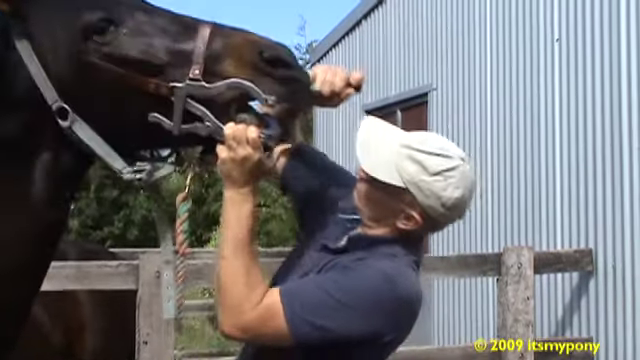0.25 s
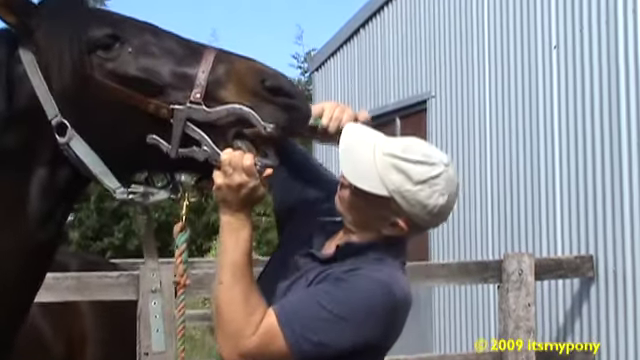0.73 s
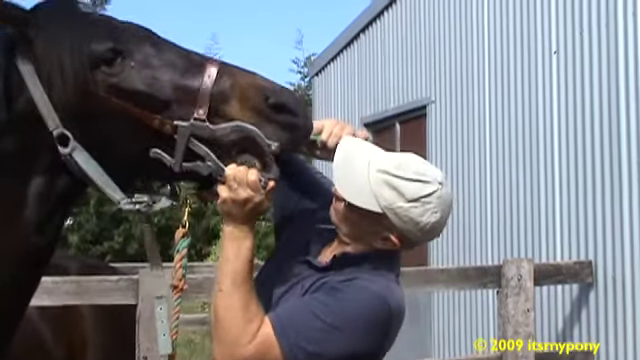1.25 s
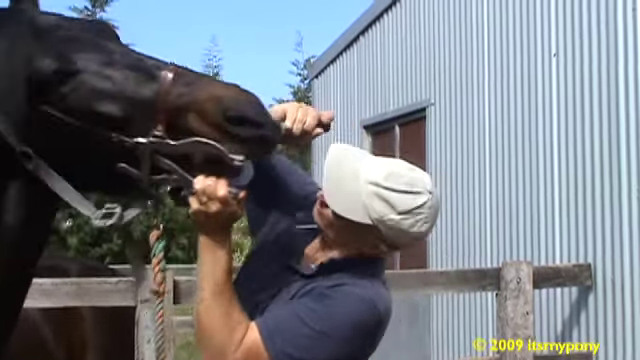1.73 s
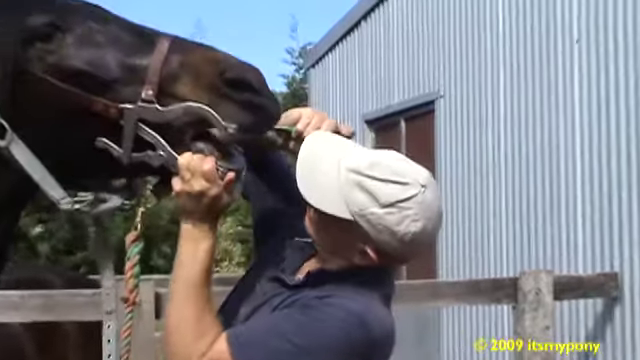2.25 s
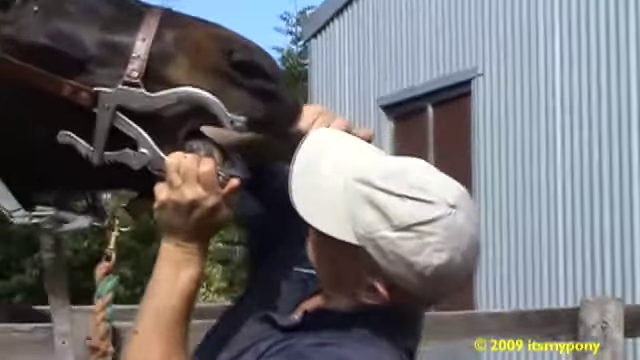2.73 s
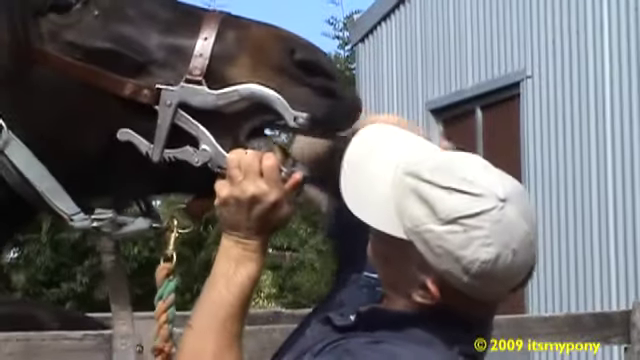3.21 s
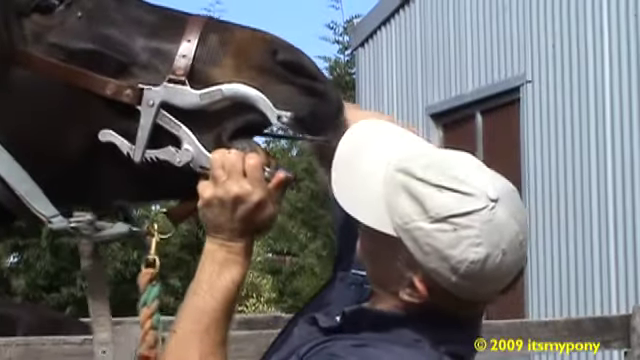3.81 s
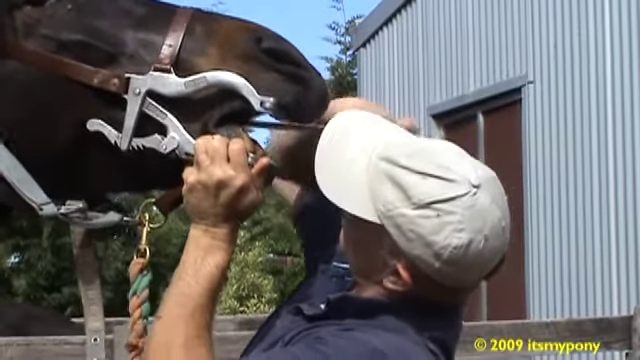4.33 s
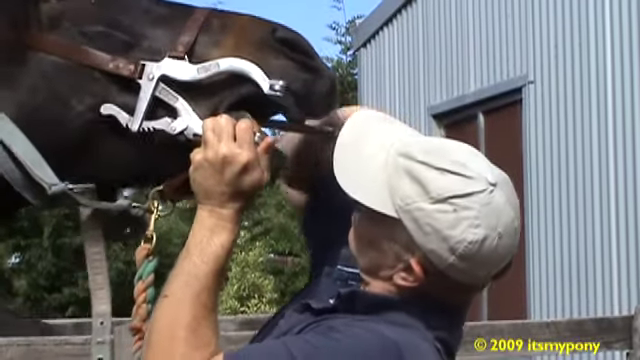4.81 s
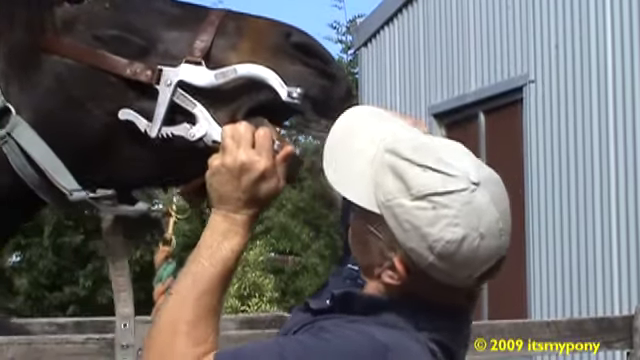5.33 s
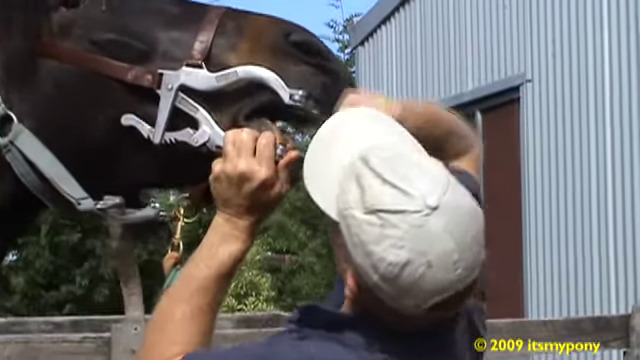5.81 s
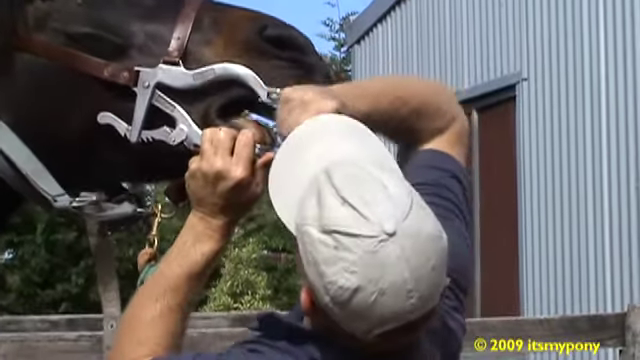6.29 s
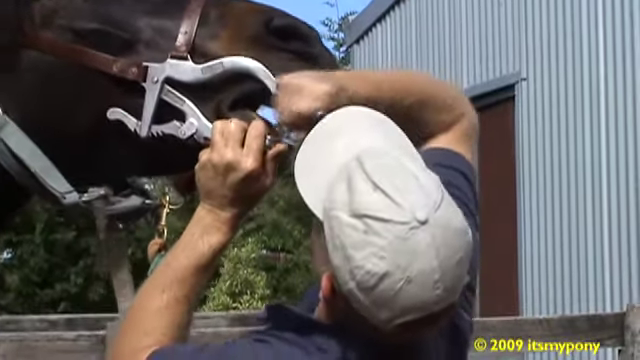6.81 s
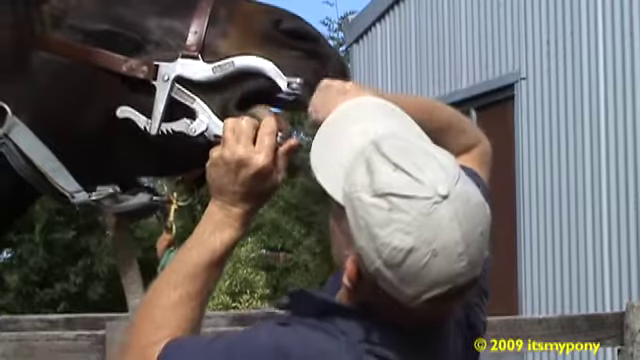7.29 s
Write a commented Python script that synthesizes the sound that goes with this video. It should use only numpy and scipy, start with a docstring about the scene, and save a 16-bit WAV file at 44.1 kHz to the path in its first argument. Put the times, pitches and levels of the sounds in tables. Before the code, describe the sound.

Hesitant short rubs and light tooth taps give way to steady, vigorous rasping, around ten strokes a second, rough and metallic with a bony resonance. Steel knocks grow frequent and hard, loudest in the second half, with dull thuds of arm and head near the end. The microphone is near, in open air beside a metal shed; soft traffic rumble and brief bird whistles remain in the background.

```python
"""A yard: a long steel rasp is worked in quick strokes over a horse's molars.
Random slips of the cut excite resonances of jaw and blade, and the shaft hums, partly locked to its own tone.
Steel knocks on tooth and mouth gag are decaying noise through resonances, with a sine for the gag's clang.
Behind lie dull thuds, a bird's gliding whistle, a far engine's unsteady sine as it climbs through its gears,
and filtered noise for distant traffic and air."""
import sys
import numpy as np
from scipy import signal
from scipy.io import wavfile
from scipy.ndimage import uniform_filter1d

SR = 44100
rng = np.random.default_rng(int(sys.argv[2]) if len(sys.argv) > 2 else 0)


def invert_db(x):
    """Field ratio 10**(x/20) for x, a level in decibels (scalar or array-like)."""
    u = np.asarray(x, float) / 20
    return 10 ** u


def transcribe(u):
    """Save the signal u as a 16-bit wav file named by the first command-line argument.

    u: samples, shape (n,) or (channels, n), limited to [-1, 1]; the rate is SR.
    q: integer samples, one column per channel.
    """
    v = np.clip(np.atleast_2d(u).T, -1, 1)
    q = np.round(v * 32767).astype(np.int16)
    wavfile.write(sys.argv[1], SR, q)


N = 332955  # samples

# spectrum of traffic and air: (f/Hz, relative level/dB)
YARD_SPECTRUM = [(12, -74), (20, -35), (74, -6.5), (183, -7), (249, -15.5), (386, -11.5), (500, -14.5),
                 (836, -15.5), (1260, -14), (1810, -22.5), (3920, -23), (5470, -27.5), (8480, -30),
                 (9400, -35.5), (12200, -61), (20700, -120)]
# engine pulls and coasts: (start t/s, end t/s, first f/Hz, last f/Hz, level/dB)
ENGINE_PULLS = [(0.0, 1.472, 93, 72.1, -56), (1.781, 2.21, 64.3, 100.4, -53.5),
                (2.1, 4.8, 72.92, 79.36, -61), (3.217, 5.913, 102.1, 132.8, -50),
                (7.121, 7.7, 136, 131.2, -45)]
# warble of one chirp: (t/s from its start, f/Hz, level/dB over the call)
CHIRP_WARBLE = [(-.045, 3500, -20), (-.03, 4050, -5), (-.008, 4850, -6), (.004, 4750, -11),
                (.013, 5750, -5), (.018, 4100, -3), (.027, 3400, 3), (.034, 3500, -1), (.039, 4600, -9),
                (.044, 3300, -2), (.052, 3080, 3), (.064, 3250, 4), (.072, 3900, -8), (.077, 3350, -12),
                (.085, 2950, 1), (.094, 3500, -4), (.1, 3700, -25)]
# bird calls: (t/s, level/dB)
BIRD_CALLS = [(0.162, -49), (0.845, -51), (1.834, -46.5), (5.684, -41), (6.318, -42), (6.995, -40.5)]
# direct sound and early echoes of a call: (delay t/s, level/dB)
CHIRP_ECHO_PATHS = [(0, 0), (.006, -9), (.013, -10), (.029, -13)]
# dull thuds of arm and head: (t/s, level/dB, f/Hz)
BODY_THUDS = [(2.075, -42.5, 185.3), (2.691, -44, 158), (2.886, -49, 201.3), (5.567, -44, 182.6),
              (6.003, -41, 121.2), (6.235, -37.5, 179), (6.429, -45, 179), (6.606, -39, 184.7),
              (6.778, -44, 193), (6.961, -39.5, 181.3), (7.135, -41.5, 194.9), (7.326, -44, 187)]
# dull taps of the rasp head on tooth: (t/s, peak level/dB, f/Hz)
HEAD_TAPS = [(0.0795, -26, 706), (0.092, -36, 1000), (0.304, -42, 600), (0.359, -40, 930),
             (0.388, -30, 596), (0.397, -32, 1150), (0.413, -33, 930), (0.495, -31, 649), (0.505, -30, 594),
             (0.591, -39, 929), (0.656, -46, 1042), (0.878, -41, 2050), (0.968, -29, 1290),
             (1.004, -34.5, 1300), (1.221, -34.5, 950), (1.271, -40.5, 2040), (1.357, -36, 923),
             (1.449, -29.5, 742), (1.536, -29, 610), (1.633, -22, 600), (1.801, -26, 606),
             (2.091, -35, 701), (2.118, -35, 605.2), (2.299, -23, 614), (3.307, -23, 774),
             (3.51, -17, 978.7), (3.703, -23, 1130), (4.334, -36, 1500), (4.574, -16.5, 953),
             (5.173, -14.5, 992.6), (6.215, -23.5, 729), (6.535, -18, 800), (6.587, -30, 614),
             (6.609, -21, 695.5), (6.636, -23.5, 1450), (6.703, -30, 1490), (6.975, -20, 610),
             (7.324, -21, 1046)]
# steel knocks: (t/s, steel level/dB, gag clang level/dB over the steel, brightest ring f/Hz)
STEEL_BLOWS = [(0.081, -44, -26, 2040), (0.258, -23.5, -37, 4200), (0.962, -29, -8.5, 6050),
               (1.4546, -31, -7, 2330), (1.6085, -29, -5.5, 2620), (1.803, -33.5, -11, 2275),
               (2.2511, -20, -12, 2972), (2.4417, -20, -19, 4200), (2.6039, -23, -8, 2310),
               (2.8617, -19.5, -14, 2935), (2.9411, -17, -20, 2850), (3.045, -14.5, -34, 2397),
               (3.1318, -18.5, -22, 3268), (3.145, -20, -16, 3263), (3.224, -21.5, -29, 3320),
               (3.5125, -29.5, -8, 3740), (3.5802, -22.5, -30, 3763), (3.9843, -16, -40, 2920),
               (4.121, -25.5, 2, 3687), (4.274, -14, -32, 3388), (4.342, -15.5, -6, 3523),
               (4.423, -12, -21, 2884), (4.4982, -13, -22, 3400), (4.577, -23.5, 1, 3040),
               (4.686, -13.5, -13, 2827), (4.7726, -11.5, -31, 2720), (5.054, -30, 6.5, 2783),
               (5.672, -38, -46, 3800), (5.7724, -14.5, -4, 2476), (5.9326, -10, -8.5, 7034),
               (6.0996, -15.5, -3.5, 4185), (6.326, -15.5, -2.5, 5547), (6.4792, -23, 0, 2988),
               (6.5356, -31, -12, 1933), (6.589, -31, -3, 2193), (6.6083, -26, -3.5, 2860),
               (6.712, -12.5, -10, 2800), (6.785, -21, -15, 3635), (6.8834, -11, -9, 3468),
               (6.9626, -27, -15, 2721), (7.1422, -22.5, -23, 3255), (7.232, -17.5, -6.5, 2572),
               (7.3239, -17.5, -16, 3297), (7.445, -13, -9, 2699), (7.529, -14.5, -29, 3555)]
# treble level of each knock over its body, in the order of the knocks: (level/dB)
BLOW_TREBLE = [2, -7, 6, -15, -4.0, 0.0, -4.0, -2, -8, -2, -4.5, -4, 9, 1, -13, -4, -8, 3, -18, -6.5, -11,
               -3, -10, 0.0, -2.5, -0.5, -4, 10.0, 5, -1, 2.0, 4, -3.5, -13, -3, -3, 0.5, -11, -6, -2, -0.0,
               1, -10.5, -1, 1.0]
# single teeth of the rasp catching mid-stroke: (t/s, level/dB, ring f/Hz)
TOOTH_CATCHES = [(2.766, -41, 2860), (3.31, -28, 2300), (4.533, -29, 2860), (4.845, -22, 2860),
                 (5.475, -24, 3500), (6.667, -34, 2420), (6.723, -28, 5382), (6.977, -29.5, 3400)]
# strokes: (t/s of full pressure, release t/s, shaft hum level/dB, shaft hum f/Hz, blade grit level/dB)
RASP_STROKES = [(0.085, 0.027, -35.5, 378, -48.5), (0.265, 0.016, -47, 412, -61),
                (0.322, 0.022, -49.5, 402, -59), (0.363, 0.007, -36, 390.7, -54),
                (0.414, 0.034, -36, 393.4, -65), (0.509, 0.011, -36, 386.6, -59),
                (0.554, 0.0072, -42, 395.5, -53.5), (0.608, 0.011, -40, 391, -60),
                (0.669, 0.015, -44, 392.5, -74), (0.825, 0.023, -55, 379, -53),
                (0.967, 0.026, -34, 383.7, -60), (1.019, 0.02, -32, 373.7, -73),
                (1.241, 0.023, -50, 397, -57), (1.35, 0.026, -51, 357.8, -62),
                (1.459, 0.031, -27.5, 376.5, -37), (1.55, 0.026, -27, 379.8, -48),
                (1.642, 0.022, -24.5, 382.6, -39.5), (1.809, 0.031, -31.5, 393.5, -40.5),
                (1.948, 0.03, -29, 364.8, -52), (2.125, 0.03, -40, 380, -60.5),
                (2.232, 0.0086, -35.5, 381, -55), (2.258, 0.011, -47, 379.3, -42),
                (2.311, 0.055, -32.5, 387.5, -52), (2.421, 0.04, -31.5, 398.7, -39),
                (2.519, 0.027, -33.5, 392.8, -37), (2.602, 0.049, -28.5, 380.2, -36.5),
                (2.74, 0.041, -27, 371.4, -44), (2.802, 0.025, -31.5, 387.8, -35.5),
                (2.867, 0.025, -37, 381.6, -34), (2.901, 0.016, -23.5, 388.4, -35.5),
                (2.947, 0.011, -31, 367, -38), (2.992, 0.026, -27.5, 403, -30.5),
                (3.051, 0.054, -33.5, 358.7, -33), (3.099, 0.017, -45, 364, -37.5),
                (3.137, 0.073, -51, 381.7, -35.5), (3.211, 0.043, -26, 382, -32),
                (3.329, 0.016, -21, 362.3, -47), (3.393, 0.032, -29, 398.3, -33),
                (3.537, 0.044, -25, 364, -45), (3.617, 0.034, -26.5, 349.3, -32.5),
                (3.726, 0.04, -23, 376.2, -36.5), (3.813, 0.041, -29, 392.3, -33),
                (3.941, 0.04, -25, 380.6, -39), (4.03, 0.037, -28.5, 401.2, -28.5),
                (4.148, 0.032, -30, 391.3, -32.5), (4.174, 0.027, -20.5, 371.6, -49),
                (4.247, 0.038, -27, 389.4, -28), (4.348, 0.047, -31.5, 396, -44.5),
                (4.405, 0.02, -24.5, 377.3, -59), (4.445, 0.039, -28.5, 365.2, -33.5),
                (4.504, 0.025, -29.5, 397.7, -37.5), (4.586, 0.027, -25, 375.5, -30.5),
                (4.68, 0.036, -28.5, 384, -27), (4.771, 0.0086, -34, 370.3, -26),
                (4.789, 0.036, -20.5, 366.2, -39.5), (4.872, 0.03, -31.5, 355.3, -28),
                (4.992, 0.031, -22.5, 359, -39), (5.074, 0.028, -21, 366.7, -26.5),
                (5.175, 0.032, -38, 382, -41), (5.204, 0.022, -17, 370.6, -41.5),
                (5.285, 0.033, -33, 398.4, -30), (5.368, 0.029, -31, 376.3, -37),
                (5.411, 0.038, -24, 358.4, -42.5), (5.498, 0.033, -26, 356, -31.5),
                (5.591, 0.038, -27.5, 380.3, -39), (5.637, 0.012, -29, 374.5, -50),
                (5.689, 0.022, -29.5, 357.4, -35), (5.778, 0.046, -25, 372.7, -56),
                (5.938, 0.014, -27, 365, -31), (5.999, 0.029, -29.5, 389.3, -48),
                (6.106, 0.023, -28, 366.3, -43), (6.183, 0.021, -33, 362, -45.5),
                (6.249, 0.026, -25, 356, -39.5), (6.331, 0.069, -29, 362.6, -46),
                (6.443, 0.027, -29.5, 396.2, -40), (6.483, 0.026, -28, 365.7, -41.5),
                (6.562, 0.049, -35, 351.2, -54), (6.614, 0.039, -22.5, 355.8, -39),
                (6.716, 0.025, -32.5, 378.2, -37.5), (6.797, 0.036, -32, 358, -48),
                (6.889, 0.037, -27, 339, -43), (6.975, 0.032, -30.5, 367.3, -38),
                (7.085, 0.036, -36, 379.7, -52), (7.154, 0.021, -38.5, 349, -42),
                (7.237, 0.036, -32.5, 355.7, -46.5), (7.34, 0.02, -28, 406, -37.5),
                (7.407, 0.063, -42, 385.3, -55), (7.452, 0.033, -29.5, 374, -40),
                (7.51, 0.015, -28.5, 365, -58), (7.548, 0.02, -17.5, 326, -32.5)]
# colour of each stroke, in order: (jaw rumble level/dB, singing blade ring f/Hz, ring level/dB over the grit)
STROKE_COLOURS = [(-37, 1500, 0.5), (-46, 3300, 1), (-49.5, 3500, -11), (-49, 2380, -3), (-45.5, 2600, -10),
                  (-45, 1700, -3), (-52, 3640, -5), (-51.5, 2760, 3), (-66, 2260, -6), (-50, 3600, -15),
                  (-43.5, 2380, -3), (-46, 2130, -7), (-50.5, 2100, -4), (-53, 1100, -7), (-33.5, 2100, -3),
                  (-32.5, 800, -4), (-31.5, 1700, -7), (-31, 2200, 1), (-35, 3400, -13), (-52, 2100, -14),
                  (-38.5, 3940, -5), (-47, 630, -10), (-41, 3800, -11), (-34.5, 2000, -3), (-35, 1946, -6),
                  (-35.5, 2340, -0.5), (-33, 1600, -10), (-30, 2340, -1), (-32.5, 3400, -16),
                  (-25, 1150, 0.5), (-42, 7600, -12), (-30.5, 2200, -9), (-29.5, 5100, -12),
                  (-50, 4400, -5), (-39, 3000, -12), (-28.5, 2000, -5), (-31.5, 1920, 8),
                  (-31.5, 2000, -15), (-32.5, 3520, -5), (-32.5, 3660, -1), (-27, 4000, -10.5),
                  (-31, 3516, -6.5), (-28, 1700, -4), (-31, 5100, -11), (-26.5, 2000, -5), (-33.5, 2864, 3),
                  (-29.5, 9000, -15.5), (-28, 3596, 1), (-43, 2200, -3), (-33.5, 2896, -1),
                  (-36.5, 4620, -12), (-26.5, 2600, -14), (-30.5, 5800, -11), (-28, 2890, 2),
                  (-30.5, 2120, 1), (-25.5, 2830, -4), (-26.5, 3400, -6), (-27.5, 1300, -14),
                  (-33.5, 1600, -8), (-25.5, 2200, -4), (-29.5, 1500, -19), (-31, 2842, -1.5),
                  (-31, 1100, -17), (-32, 8000, -12.5), (-28, 2500, -23), (-36, 1960, -7), (-31, 3550, -3),
                  (-29, 2800, -11), (-26, 7311, -13), (-32, 2300, 2.5), (-39, 1900, -8), (-38, 2000, -9),
                  (-33, 2900, -9), (-32.5, 1400, -5), (-34.5, 2500, -11), (-38.5, 2910, 4),
                  (-34.5, 7200, -6), (-33.5, 2400, -1), (-27.5, 5500, -6), (-34, 4700, -2),
                  (-33.5, 4000, -2), (-37, 1970, -20), (-42, 3500, -9), (-36, 3540, 2), (-38.5, 1800, -12),
                  (-31, 3585, -1.5), (-57, 3620, -10), (-35.5, 3200, -3), (-38, 3630, 1),
                  (-25.5, 2400, -5.5)]
# treble over the blade's body for each stroke, in order: (level/dB)
STROKE_EDGE = [-2.5, -12, -15, -13, -14, -12, -13, -7, -8.0, -5, -4, -8, -8, -13, -10.5, -9, -13, -12, -15,
               -4, -10.0, -6, -5, -12, -11.5, -7, -10.0, -7.5, -14, -13, -12, -7.5, -7, -17, -3, -9.5, -5,
               -4.5, -4.5, -2.5, -12, -7.5, -8.5, -6.0, -11.5, -12.5, -8, -14, -11, -13, -11, -13.5, -9,
               -10, -9, -8.0, -7.5, -12.5, -7.5, -6, -8.0, -12, -5, -11.5, 2, 2, 2.5, -2, -5, -3.5, -3, -2,
               -8, -10, -7.5, -14, -4, -12, -5, -16, -11, -7, -3, -1, 3.5, -8, -7, -5, -5, -8]
# resonances of the jaw: (f/Hz, width/Hz, level/dB)
JAW_MODES = [(222, 99, -12), (565, 50, 6), (760, 40, -6), (955, 35, 7.5), (1325, 50, 2)]
# resonances of the blade: (f/Hz, width/Hz, level/dB)
BLADE_MODES = [(2330, 290, -1), (2860, 50, 10), (3400, 820, -1), (3625, 82.9, 8), (4215, 81, -3.5),
               (5726, 240, 3.5), (7020, 1950, -5.5), (7440, 180, 4.5)]
# colour of the scrape between the resonances: (f/Hz, level/dB)
SCRAPE_SPECTRUM = [(150, -1.5), (500, -10.5), (1000, 12), (1700, -0.5), (3600, -5), (4700, -19.5),
                   (7500, -17), (9500, -19)]


def evened(x):
    """Normalisation of power: scales to rms 1."""
    return x / np.sqrt(np.mean(x ** 2) + 1e-20)


def steadied(x, seconds=0.07):
    """Division by the running rms: slow swells vanish, the grain stays, and the hand sets the level."""
    return x / np.sqrt(uniform_filter1d(x ** 2, round(seconds * SR)) + 1e-9)


def wander(seconds):
    """Low-pass filtered chance: smooth variation of rms 1, drawn at every 16th sample."""
    size = max(round(seconds * SR / 16), 1)
    slow = rng.standard_normal(N // 16 + 2)
    slow = uniform_filter1d(uniform_filter1d(slow, size), size)
    return np.interp(np.arange(N) / 16, np.arange(len(slow)), evened(slow))


def coloured(x, points):
    """Minimum-phase filtering: a (f/Hz, level/dB) spectrum is imposed causally."""
    hz, db = np.transpose(points)
    bins = np.fft.rfftfreq(2048, 1 / SR)
    bin_db = np.interp(np.log(bins + 1), np.log(hz), db)
    log_gain = np.log(invert_db(np.maximum(bin_db, -90)))
    circle = np.concatenate([log_gain, log_gain[-2:0:-1]])
    # the Hilbert transform of the log gain gives the phase
    response = np.fft.ifft(np.exp(np.conj(signal.hilbert(circle)))).real
    return signal.oaconvolve(x, response)[:len(x)]


def filtered(x, order, hz, kind):
    """Butterworth filtering: a maximally flat pass band."""
    return signal.sosfilt(signal.butter(order, hz, kind, fs=SR, output="sos"), x)


def add(mix, s, sound):
    """Superposition: pressures sum from time s onward."""
    part = mix[round(s * SR):][:len(sound)]
    part += sound[:len(part)]


def resonate(x, hz, width):
    """Simple resonance of gain 1, fixed or moving: the band at hz is shifted to zero, smoothed, shifted back."""
    turn = np.exp(2j * np.pi * np.cumsum(hz * np.ones(len(x))) / SR)
    r = np.exp(-np.pi * width / SR)
    return 2 * (turn * signal.lfilter([1 - r], [1, -r], x / turn)).real


def ring(x, modes, shift_db=0., drift=0.):
    """Modal sum, neighbours in opposite phase; modes may swell and drift as the contact point moves."""
    swell = shift_db * np.array([wander(0.024) for _ in modes]) if shift_db else np.zeros(len(modes))
    bend = 1 + drift * np.array([wander(0.063) for _ in modes]) if drift else np.ones(len(modes))
    return sum((-1) ** k * invert_db(db + swell[k]) * resonate(x, hz * bend[k], width)
               for k, (hz, width, db) in enumerate(modes))


def walls(x):
    """Sparse reflection: a short tail off shed wall and fence, one tap of random sign per 20 samples."""
    response = np.zeros(SR // 2)
    at = np.arange(200, SR // 2 - 20, 20)
    response[at + rng.integers(0, 20, len(at))] = rng.choice([-1., 1.], len(at))
    response *= invert_db(-60 * np.arange(len(response)) / SR / 0.38)  # 60 dB in 0.38 s
    return signal.oaconvolve(x, response / np.linalg.norm(response))[:N]


def yard():
    """Broadband noise of many far sources: traffic and air, swelling slowly."""
    air = evened(coloured(rng.standard_normal(N), YARD_SPECTRUM))
    return invert_db(-51.5 + 0.57 * wander(0.2)) * air


def engine():
    """Periodic firing: a distant engine's tone as one gliding sine, slightly unsteady in pitch and level."""
    out, flutter = np.zeros(N), wander(0.065)
    for start, end, from_hz, to_hz, db in ENGINE_PULLS:
        t = np.arange(start, min(end, N / SR), 1 / SR)
        hz = from_hz + (to_hz - from_hz) * (t - start) / (end - start)
        turn = 2 * np.pi * np.cumsum(hz * (1 + 0.0072 * flutter[:len(t)])) / SR
        # a quarter of each pull is spent fading in and out
        fade = signal.windows.tukey(round((end - start) * SR) + 2, 0.25)[:len(t)]
        level = np.sqrt(2) * invert_db(db + 2.4 * flutter[-len(t):])
        add(out, start, level * np.sin(turn) * fade)
    return out


def bird():
    """Frequency modulation: a hoarse warbled whistle with a faint octave, blurred by echoes."""
    out, chance = np.zeros(N), rng.standard_normal(len(BIRD_CALLS))
    s, hz, db = np.transpose(CHIRP_WARBLE)
    t = np.arange(s[0], s[-1], 1 / SR)
    hz, db = uniform_filter1d([np.interp(t, s, hz), np.interp(t, s, db)], size=130)
    for (start, level_db), high in zip(BIRD_CALLS, chance):
        turn = 2 * np.pi * np.cumsum(hz * (1 + 0.012 * high)) / SR  # each call a little different
        whistle = np.sin(turn) + invert_db(-30) * np.sin(2 * turn)
        for delay, echo_db in CHIRP_ECHO_PATHS:
            add(out, start + s[0] + delay, invert_db(level_db + db + echo_db) * whistle)
    out = out * invert_db(2.8 * wander(0.005))  # hoarseness
    return out + invert_db(-4.5) * walls(out)


def thuds():
    """Damped impact of soft bodies: a low bump with a weaker inharmonic overtone."""
    out, t = np.zeros(N), np.arange(round(.15 * SR)) / SR
    swell = np.e * t / 0.0065 * np.exp(-t / 0.01)
    for s, db, hz in BODY_THUDS:
        tone = np.sin(2 * np.pi * hz * t) + 0.72 * np.sin(2 * np.pi * 1.306 * hz * t)
        add(out, s, invert_db(db) * swell * tone)
    return out


def tooth_taps():
    """Heavily damped resonance: a puff of noise drives a short, broad ring."""
    out, t = np.zeros(N), np.arange(round(.05 * SR)) / SR
    for (s, db, hz), hiss in zip(HEAD_TAPS, rng.standard_normal((len(HEAD_TAPS), len(t)))):
        puff = hiss * invert_db(-60 * t / 0.022)
        tap = resonate(resonate(puff, hz, 300), hz, 1000)
        add(out, s, invert_db(db) * tap / abs(tap).max())
    return out


def steel_knocks():
    """Impact excitation: a crack and rattle ring the blade's modes, newly mixed each blow; the gag clangs."""
    out, t = np.zeros(N), np.arange(round(.12 * SR)) / SR
    rise_s = 0.0013
    blows = [(*row, treble) for row, treble in zip(STEEL_BLOWS, BLOW_TREBLE)]
    blows += [(s, db, -40, hz, -3) for s, db, hz in TOOTH_CATCHES]
    noise = rng.standard_normal((len(blows), 2, len(t)))
    mixes = rng.standard_normal((len(blows), len(BLADE_MODES)))
    for (s, db, clang_db, hz, treble_db), (hiss, loose), mix in zip(blows, noise, mixes):
        rattle_db = 2.3 * evened(uniform_filter1d(loose, size=90))
        crack = invert_db(-0.5 - 60 * t / 0.0012)
        bounce = invert_db(2.0 - 60 * t / 0.013)
        rattle = invert_db(-10.0 - 60 * t / 0.064 + rattle_db)
        blow = hiss * np.minimum(t / rise_s, 1) * (crack + bounce + rattle)
        modes = [(f, 1.62 * w, d + 3 * m) for (f, w, d), m in zip(BLADE_MODES, mix)]
        steel = invert_db(18.5) * ring(blow, modes) + invert_db(21.5) * resonate(blow, hz, 220)
        steel = filtered(steel, 2, 1200, "high")  # small parts radiate no bass
        body = filtered(steel, 2, 4400, "low")
        steel = body + invert_db(treble_db + 2.5 - 60 * t / 0.09) * (steel - body)  # the treble dies first
        peak = 2 * np.sqrt(uniform_filter1d(steel ** 2, 100).max())
        clang_hz = 1310 * (1 + 0.029 * mix[0])
        clang = np.sin(2 * np.pi * clang_hz * t) * (1 - np.exp(-t / 0.00006))
        clang = clang * invert_db(clang_db - 60 * t / 0.066)
        add(out, s - rise_s, invert_db(db) * (steel / peak + clang))
    return out


def slips(per_s, spread_db):
    """Stick-slip: tiny catches of the cutting edge, most small, a few large, in clumps."""
    size = invert_db(spread_db * np.minimum(rng.exponential(1, N), 4)) * rng.choice([-1., 1.], N)
    chance = per_s * invert_db(4.2 * wander(.004)) / SR
    return evened(size * (rng.random(N) < chance))


def pressure():
    """Superposed power envelopes: swell and release of every stroke for hum, rumble, grit and ring."""
    t = np.arange(0, N / SR + .002, .001)  # steps of 1 ms
    power, blow_s = np.full((4, 1), 1e-12), np.transpose(STEEL_BLOWS)[0]
    for (s, fall, hum_db, _, grit_db), (rumble_db, _, ring_db) in zip(RASP_STROKES, STROKE_COLOURS):
        # pressure builds about as it lets go, but at once after a knock
        landed = np.any((s > blow_s) & (s - blow_s < .009))
        rise = 0.007 if landed else 1.07 * fall
        lead = 0 if landed else 0.0041  # the teeth bite before the shaft starts to hum
        late = t - s + np.outer([0, 1, 1, 1], lead)
        u = np.where(late < 0, -late / max(rise, .004), late / max(fall, .004))
        level_db = np.c_[hum_db, rumble_db, grit_db, grit_db + ring_db].T
        power = power + invert_db(level_db - 9.4 * u ** 2.29) ** 2
    keep = invert_db(-4.125) ** 2  # the shaft rings on after the hand eases, falling 4.125 dB per ms
    power[0] = signal.lfilter([1 - keep], [1, -keep], power[0])
    return [np.interp(np.arange(N) / SR, t, np.sqrt(p)) for p in power]


def shaft(hum, t):
    """Self-sustained vibration: most of the hum is a locked tone, the rest resonance shaken by slips."""
    hz = np.interp(t, *np.transpose(RASP_STROKES)[::3])
    turn = 2 * np.pi * np.cumsum(hz * (1 + 0.017 * wander(0.0099))) / SR
    locked = np.sqrt(2) * np.sin(turn)
    shaken = steadied(resonate(resonate(slips(1200, 2.0), 371.6, 76), 408.0, 91), 0.13)
    hum = hum * invert_db(1.4 * wander(0.011))  # the grip chatters
    shaken_share = 0.18  # of the power
    return resonate(hum * (np.sqrt(1 - shaken_share) * locked + np.sqrt(shaken_share) * shaken), hz, 310)


def jaw(rumble):
    """Bone resonance: slips ring the jaw's modes beside a dull scrape."""
    low = slips(800, 3.3)
    bone = evened(ring(low, JAW_MODES, shift_db=2.5, drift=0.02))
    scrape = evened(filtered(coloured(low, SCRAPE_SPECTRUM), 2, [200, 1700], "band"))
    return rumble * steadied(bone + invert_db(1.0) * scrape)


def blade(grit, t):
    """Plate modes under slips: body and edge bands are levelled apart, so the treble follows each stroke."""
    high = slips(1300, 2.0)
    steel = invert_db(10) * evened(ring(high, BLADE_MODES, shift_db=3.5, drift=0.018))
    steel = steel + invert_db(-1.0) * evened(coloured(high, SCRAPE_SPECTRUM))
    body = filtered(steel, 3, [1700, 4400], "band")
    edge = filtered(steel, 3, 4400, "high")
    edge_db = np.interp(t, np.transpose(RASP_STROKES)[0], STROKE_EDGE) + 2.2 * wander(0.034)
    grit = grit * invert_db(1.4 * wander(0.004))  # the cut comes in bursts
    return grit * (steadied(body) + invert_db(edge_db) * steadied(edge))


def singing_ring(sing, t):
    """Narrow-band resonance: slips make the blade sing at a pitch that steps midway between strokes."""
    stroke_s = np.transpose(RASP_STROKES)[0]
    middles = (stroke_s[1:] + stroke_s[:-1]) / 2
    hz = np.transpose(STROKE_COLOURS)[1][np.searchsorted(middles, t)] * (1 + 0.0041 * wander(0.014))
    return sing * steadied(resonate(resonate(slips(700, 3.9), hz, 170), hz, 380), 0.043)


def rasp():
    """Coupled bodies under one hand: shaft, jaw and blade share the pressure of the strokes."""
    hum, rumble, grit, sing = pressure()
    t = np.arange(N) / SR
    return singing_ring(sing, t) + shaft(hum, t) + jaw(rumble) + blade(grit, t)


def scene():
    """Superposition of all sources; the near ones are also reflected by the walls."""
    background = yard() + engine() + bird() + thuds()
    near = tooth_taps() + steel_knocks() + rasp()
    return (background + near + invert_db(-11.5) * walls(near))[None]


def low_pass(x):
    """Removes everything above the highest recorded frequency."""
    return signal.sosfilt(signal.butter(12, 9550, fs=SR, output="sos"), x)


def record(dry):
    """Band limitation: the microphone passes little above 9200 Hz."""
    limit = signal.firwin(401, 9200, window=("kaiser", 10), fs=SR)
    mix = signal.oaconvolve(dry, limit[None], "same")
    return low_pass(mix)


dry = scene()
out = record(dry)
transcribe(out)
```